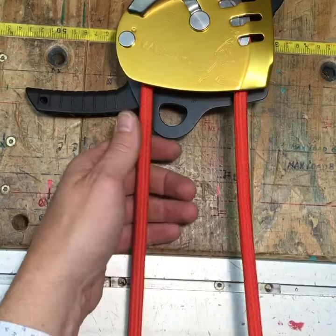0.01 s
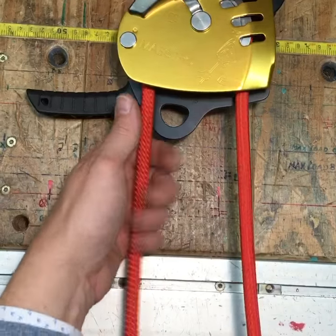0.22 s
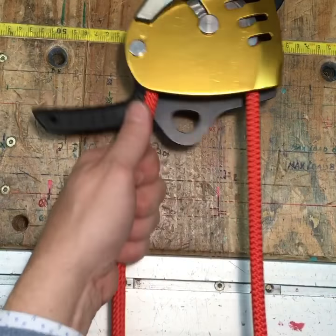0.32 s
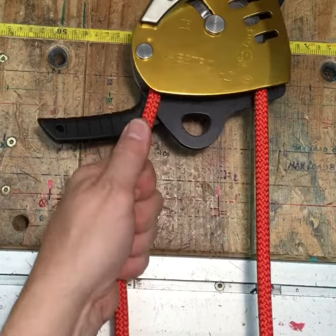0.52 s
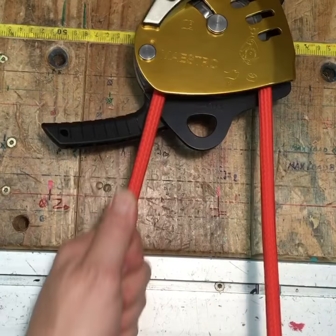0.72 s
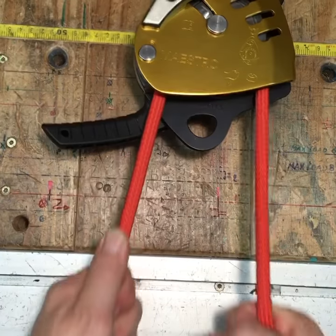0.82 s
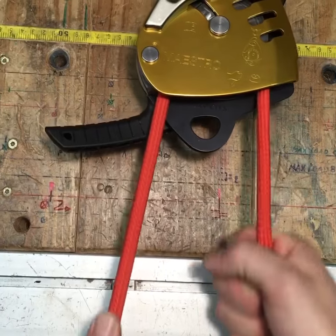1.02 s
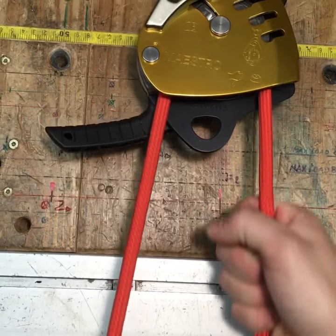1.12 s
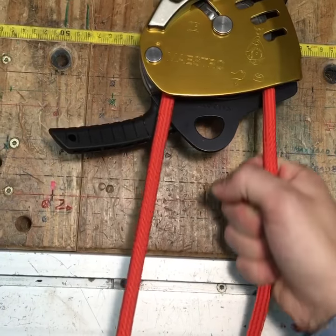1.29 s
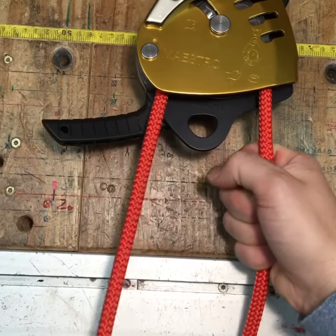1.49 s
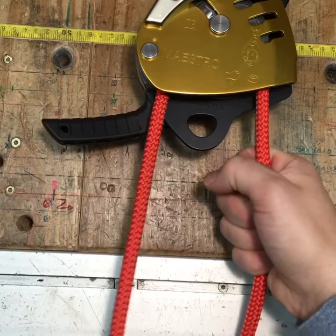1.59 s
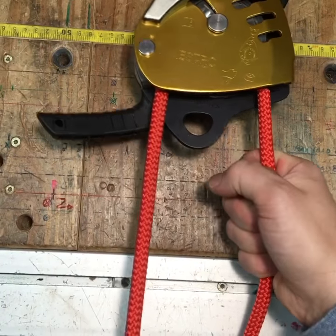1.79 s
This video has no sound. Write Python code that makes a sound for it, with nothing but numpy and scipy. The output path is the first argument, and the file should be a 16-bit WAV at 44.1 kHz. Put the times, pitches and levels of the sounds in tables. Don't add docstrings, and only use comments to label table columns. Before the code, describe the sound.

A metal ratchet pulley rattles in one fast run of bright clicks as rope is hauled through, preceded by a short knock on a wooden bench and followed by a soft tap; close microphone, quiet workshop.

```python
import sys
import numpy as np
from scipy import signal
from scipy.fft import rfft, irfft, next_fast_len
from scipy.io import wavfile

SR = 44100
rng = np.random.default_rng(int(sys.argv[2]) if len(sys.argv) > 2 else 0)


def invert_db(level):
    return 10 ** (np.asarray(level, dtype=float) / 20)


def bounce(signal):
    frames = np.transpose(np.atleast_2d(signal))
    limited = np.clip(frames, -1, 1)
    pcm = np.round(limited * 32767).astype(np.int16)
    wavfile.write(sys.argv[1], SR, pcm)


N = 79380

# (frequency [Hz], density [dB per Hz])
AIR_SPECTRUM = [(22, -17), (45, 7), (100, -4.5), (190, -5), (480, -23.5), (1200, -27), (5000, -32),
                (16000, -29.5)]
# (time [s], level [dB], start pitch [Hz], end pitch [Hz], decay [s])
FLEXES = [
    (.208, -34.5, 103.4, 72, .017),
    (.157, -39, 195, 184, 0.0088),
    (1.1, -49.5, 99, 79, .014),
    (1.516, -47.5, 210, 205, 0.0063),
    (.2022, -22, 1070, 1075, 0.0015),
    (.2022, -21, 2136, 1930, 0.00046),
]
# (time [s], level [dB])
BRUSH_LEVEL = [(0, -61.5), (.1, -63.5), (0.147, -69), (0.174, -52.5), (.21, -59), (.26, -72), (.4, -95),
               (1.3, -84), (1.37, -61.5), (1.42, -85), (1.49, -60), (1.562, -66.5), (1.66, -63), (1.8, -90)]
# (frequency [Hz], density [dB per Hz])
BRUSH_SPECTRUM = [(300, -38), (1000, -3.5), (2500, -6), (4700, -8), (10700, -4.5), (16000, -7.5)]
# (time
# [s], peak level [dB], contact brightness [Hz], contact length [s])
FIRST_KNOCKS = [
    (.163, -35.5, 206, 0.023),
    (.168, -41, 2500, 0.00084),
    (.180, -50, 12000, 0.005),
    (.194, -34, 14500, 0.00094),
    (.202, -20, 4320, 0.0014),
    (.215, -34, 890, 0.013),
    (.227, -33, 3500, 0.00072),
    (.238, -24, 241, 0.0022),
    (.249, -67, 2530, 0.0013),
]
LAST_KNOCKS = [
    (1.452, -62, 6100, 0.0019),
    (1.501, -66, 12000, 0.001),
    (1.507, -32.5, 8300, 0.0043),
    (1.515, -40, 1505, 0.00053),
    (1.527, -46.5, 1480, 0.0022),
]
HAND_TOUCHES = [
    (.300, -56.5, 1500, 0.024),
    (1.617, -63, 8000, .0016),
    (1.648, -51, 2500, 0.012),
    (1.665, -56, 910, .01),
    (1.685, -49, 1100, 0.0078),
    (1.755, -61, 1010, .004),
]
# (frequency [Hz], level [dB], T60 [s])
FIRST_BENCH_MODES = [(9900, -38, 0.014), (174, 0.5, 0.077), (220, -4, 0.093), (258.4, -7.5, 0.12),
                     (380, -16.5, 0.099), (633, -6.5, 0.05), (1092, 4.5, 0.035), (1290, 7, 0.014),
                     (1777, -3, 0.015), (1985, 1.5, .025), (2600, 3.5, 0.0098), (3650, -4.5, 0.036),
                     (6460, 2, 0.033)]
LAST_BENCH_MODES = [(212, -4.5, 0.15), (404.6, -5, 0.14), (661, -0.5, 0.056), (1036, -9.5, 0.051),
                    (1180, -5.5, 0.074), (1412, 0, 0.033), (1817, 5, 0.017), (2210, -0.5, 0.021),
                    (2450, 1, 0.013), (3130, -17, 0.0079), (3480, -2, 0.016), (3780, -6, 0.012),
                    (5580, -3, 0.0079)]
# (frequency [Hz], density [dB per Hz])
CLATTER_SPECTRUM = [(40, -50), (120, -50), (400, -18), (1200, -1.5), (2500, -4.5), (5000, -15.5),
                    (12000, 0)]
# (time [s], peak level [dB])
TIP_TICKS = [(0.4355, -25), (0.475, -33), (0.502, -33), (.5415, -25), (0.567, -30), (0.6163, -12.5),
             (0.632, -26), (.688, -37), (.7388, -15), (0.763, -14), (0.786, -26), (0.8216, -47),
             (0.853, -40), (0.9305, -21), (0.966, -30), (1.0025, -20), (1.0196, -21), (1.077, -25),
             (1.0929, -22), (1.1415, -27), (1.152, -19.5), (1.1905, -26), (1.2085, -16), (1.244, -31),
             (1.2563, -14)]
# (time [s], peak level [dB], cam ring [dB], rim ring [dB], web ring [dB])
TEETH = [(0.4379, -16, -34.5, -30.5, -28.5), (0.4786, -16, -38, -30.5, -27), (0.5051, -15, -40, -31.5, -24),
         (0.5278, -10, -27.5, -35, -25), (0.5501, -15, -40.5, -37, -36), (0.5712, -15, -28.5, -31.5, -29.5),
         (0.5932, -14, -34, -37, -29.5), (0.612, -13, -32, -37, -45), (0.6325, -17, -33.5, -34.5, -25),
         (0.6516, -11.5, -31.5, -36, -41), (0.6708, -15.5, -33.5, -34.5, -33),
         (0.6905, -12.5, -36.5, -36, -31), (0.7127, -14.5, -30.5, -30.5, -27.5),
         (0.7335, -16.5, -36.5, -39, -37), (0.7538, -12.5, -34, -34, -25.5),
         (0.7747, -13.5, -34.5, -38, -26), (0.796, -17.5, -32, -31.5, -25), (0.8159, -19, -36, -33, -28),
         (0.8358, -12, -41, -37, -29.5), (0.856, -12.5, -33.5, -35, -33), (0.8759, -16, -35.5, -29, -33),
         (0.8979, -11.5, -30, -41, -27.5), (0.9213, -14, -37.5, -34.5, -28),
         (0.9449, -14.5, -32, -34, -31.5), (0.9705, -15.5, -35.5, -32.5, -27),
         (0.9955, -13.5, -30.5, -30, -32), (1.0234, -12.5, -38, -35, -26.5), (1.05, -19, -37, -34, -26),
         (1.0797, -13.5, -36, -35, -27), (1.1109, -14.5, -37, -33.5, -28.5),
         (1.1451, -14.5, -34, -35.5, -26.5), (1.1775, -14, -34, -36.5, -38),
         (1.21, -16.5, -36.5, -32, -25.5), (1.2473, -16.5, -37.5, -37.5, -34)]
# (frequency [Hz], density [dB per Hz])
CRACK_SPECTRUM = [(500, -52), (1000, -49), (1500, -2.5), (3000, -42.5), (5000, -4), (9000, 0), (14000, -1),
                  (16000, 2)]
# (frequency [Hz], level [dB], T60 [s])
SHEAVE_MODES = [(11900, -8, .007), (12620, -3, .008), (13100, -4, .007), (13330, -4, .007),
                (13650, -3, .008), (13950, -1, .009), (14350, -2, .007), (14600, -2, .007),
                (14850, 0, .008), (15300, -8, .006)]
RIM_MODES = [(4600, -20, 0.064), (5350, -13, 0.036), (5775, -7.5, 0.031), (6220, -20, 0.054),
             (6740, -14, 0.036), (7097, -1.5, 0.027), (7503, -7, 0.019), (8460, -9.5, 0.025)]
WEB_MODES = [(9130, -6.5, 0.017), (9520, -8, 0.028), (9800, -0.5, 0.023), (10250, -11, 0.015),
             (10920, -10.5, 0.019)]
CAM_MODES = [(3560, -6, .009), (3640, -2, .011), (3710, 0, .013), (3790, -2, .011), (3880, -7, .009)]
PLATE_MODES = [(1295, -1, 0.1), (1717, -6, 0.038), (1810, -1.5, 0.048), (2138, -4, 0.033),
               (2420, 3.5, 0.041), (2556, -2.5, 0.047)]
HUM_MODES = [(212.4, -3, 0.14), (401.3, -13.5, 0.29), (674, -8, 0.096)]

SETTLE_S, SETTLE_DB = 0.013, -7
RING_SETTLE_DB = SETTLE_DB - 3.5
RISE_S, PLATE_RISE_S, HUM_RISE_S = 0.0002, 0.0014, 0.015
STRIKE_DB, MODE_SCATTER_DB = 15, 2


def ring(x, hz, t60):
    r = invert_db(-60 / (t60 * SR))
    w = 2 * np.pi * hz / SR
    return signal.lfilter([0, np.sin(w)], [1, -2 * r * np.cos(w), r * r], x + 1e-18)


def highpass(x, hz, order):
    return signal.sosfilt(signal.butter(order, hz, "high", fs=SR, output="sos"), x)


def colour(x, points, shape=None):
    p = np.array(points)
    edges = 20 * 2 ** np.arange(0, 10.5, 0.5)
    out = 0
    for k, (lo, hi) in enumerate(zip(edges, edges[1:])):
        hz = np.sqrt(lo * hi)
        source = x * shape(hz) if shape else x
        band = signal.sosfilt(signal.butter(2, [lo, hi], "band", fs=SR, output="sos"), source)
        gain = invert_db(np.interp(np.log(hz), np.log(p[:, 0]), p[:, 1]))
        out = out + gain * (-1) ** k * band
    return out


def rms_one(x):
    return x / np.sqrt(np.mean(x ** 2) + 1e-20)


def dying(s, db, decay_s):
    clicks = np.zeros(N)
    np.add.at(clicks, (np.asarray(s) * SR).astype(int), invert_db(db))
    return signal.lfilter([1], [1, -np.exp(-1 / (decay_s * SR))], clicks + 1e-18)


def contacts():
    hit = rng.random(N) < 9000 / SR
    height = invert_db(3.5 * np.minimum(rng.exponential(1, N), 4))
    return rms_one(hit * height * rng.choice([-1, 1], N))


def room_air():
    noise = colour(rng.standard_normal(N + SR), AIR_SPECTRUM)
    return invert_db(-58.5) * rms_one(noise[SR:])


def workshop(x):
    t60_s, wall_cut_hz = 0.32, 19000
    size = next_fast_len(N + SR)
    hz = np.arange(size // 2 + 1) * SR / size
    response = 0
    for lag in rng.uniform(0.008, 0.04, 10):
        delay = np.exp(-2j * np.pi * hz * lag)
        loop = invert_db(-60 * lag / t60_s) * delay / (1 + 1j * hz / wall_cut_hz)
        response = response + loop / (1 - loop)
    return irfft(rfft(x, size) * response, size)[:N]


def flex():
    out = 0
    for s, db, start_hz, end_hz, decay in FLEXES:
        u = np.maximum(np.arange(N) / SR - s, 0) / decay
        hz = end_hz + (start_hz - end_hz) * np.exp(-u / 2)
        swell = u ** 2 * np.exp(2 - u) / 4
        out = out + invert_db(db) * swell * np.sin(2 * np.pi * np.cumsum(hz * (u > 0)) / SR)
    return out


def brush():
    s, db = np.transpose(BRUSH_LEVEL)
    fibres = colour(rng.standard_normal(N) + 0.5 * contacts(), BRUSH_SPECTRUM)
    return invert_db(np.interp(np.arange(N) / SR, s, db)) * rms_one(fibres)


def knocks(rows, modes, body_db, late):
    times, levels, brights, _ = np.transpose(rows)
    push = 0
    for s, db, hz, length in rows:
        dull = signal.butter(2, hz, fs=SR, output="sos")
        push = push + signal.sosfilt(dull, rng.standard_normal(N)) * dying([s], [db], length)

    def lag(hz):
        return late * np.sqrt(400 / hz)

    def clatter_envelope(hz):
        band_db = levels + 1.5 - 10 * np.log10(1 + (hz / brights) ** 4)
        return dying(times + lag(hz), band_db, 0.012 * (1000 / hz) ** 0.22)

    clatter = colour(rng.standard_normal(N), CLATTER_SPECTRUM, clatter_envelope)
    body = 0
    for k, (hz, db, t60) in enumerate(modes):
        delayed = np.roll(push, int(lag(hz) * SR))
        body = body + invert_db(db) * ring(delayed, hz, t60) * (-1) ** k
    return invert_db(-2.5) * highpass(push, 850, 2) + clatter + invert_db(body_db - 11.5) * body


def ticks():
    grains = contacts() * dying(*np.transpose(TIP_TICKS), 0.0026)
    rings = sum(invert_db(db) * ring(grains, hz, t60) for hz, db, t60 in WEB_MODES + SHEAVE_MODES)
    return invert_db(-6) * highpass(grains, 8200, 2) + invert_db(-33.5) * rings


def pawl(rows, plate_db, chatter_s):
    s, peak_db, cam_db, rim_db, web_db = np.transpose(rows)
    luck = rng.standard_normal((len(s), 45))
    grains = contacts()

    def force(db, settle_db, rise):
        soft = np.exp(-1 / (rise * SR))
        blow_and_rattle = dying(s, db, chatter_s) + dying(s, db + settle_db, SETTLE_S)
        return signal.lfilter([1 - soft], [1, -soft], blow_and_rattle)

    crack = colour(grains * force(peak_db, SETTLE_DB, RISE_S), CRACK_SPECTRUM)
    out = invert_db(-11.5) * highpass(crack, 1100, 4)
    # (modes, blow [dB], rattle under blow [dB], rise [s])
    parts = [(SHEAVE_MODES, peak_db - 17.5, RING_SETTLE_DB, RISE_S),
             (RIM_MODES, rim_db - 4.5, RING_SETTLE_DB, RISE_S),
             (WEB_MODES, web_db - 6, RING_SETTLE_DB, RISE_S),
             (CAM_MODES, cam_db - 6, -12.5, RISE_S),
             (PLATE_MODES, plate_db - 13, RING_SETTLE_DB, PLATE_RISE_S),
             (HUM_MODES, -65, 0, HUM_RISE_S)]
    k = 0
    for modes, blow_db, settle_db, rise in parts:
        for hz, db, t60 in modes:
            level = blow_db + db - 10.5 + MODE_SCATTER_DB * luck[:, k]
            drive = np.roll(grains, 977 * k) * force(level, settle_db, rise)
            if rise == RISE_S:
                drive = drive + (-1) ** k * dying(s + 2 * RISE_S, level + STRIKE_DB, 1 / SR)
            out += ring(drive, hz, t60)
            k += 1
    return out


def scene():
    teeth = list(TEETH)
    near = pawl(teeth[::2], plate_db=-40.5, chatter_s=0.0027)
    near = near + pawl(teeth[1::2], plate_db=-42, chatter_s=0.0018)
    near = near + ticks()
    near = near + knocks(FIRST_KNOCKS, FIRST_BENCH_MODES, body_db=-6.5, late=0)
    near = near + knocks(LAST_KNOCKS, LAST_BENCH_MODES, body_db=-7.5, late=0.0062)
    near = near + knocks(HAND_TOUCHES, LAST_BENCH_MODES, body_db=-16.5, late=0)
    return (near + invert_db(-25) * workshop(near) + flex() + brush() + room_air())[None]


def roll_off(x):
    return signal.sosfilt(signal.butter(12, 16650, fs=SR, output="sos"), x)


def record(dry):
    steep = signal.ellip(12, 0.5, 50, 15850, fs=SR, output="sos")
    mix = signal.sosfilt(steep, dry) + invert_db(-46) * dry
    return roll_off(mix)


dry = scene()
out = record(dry)
bounce(out)
```